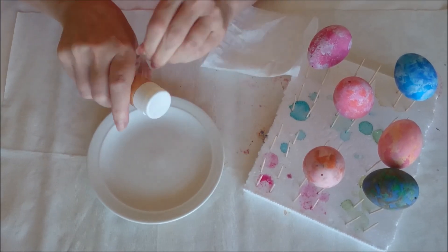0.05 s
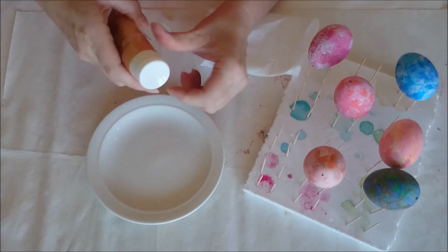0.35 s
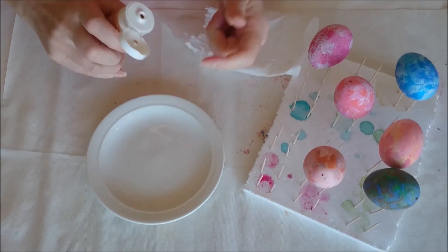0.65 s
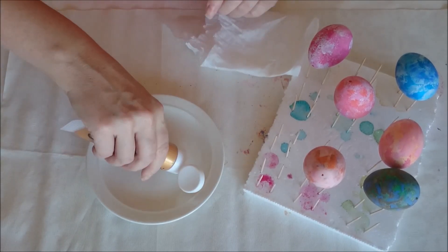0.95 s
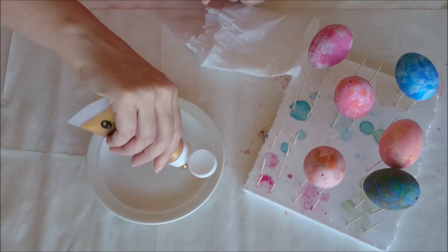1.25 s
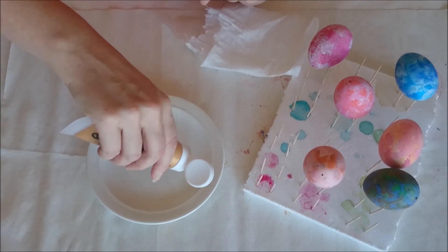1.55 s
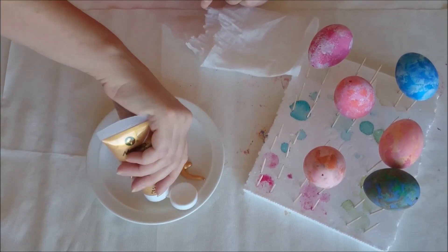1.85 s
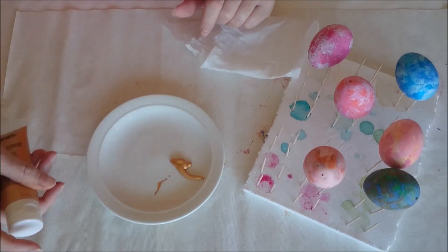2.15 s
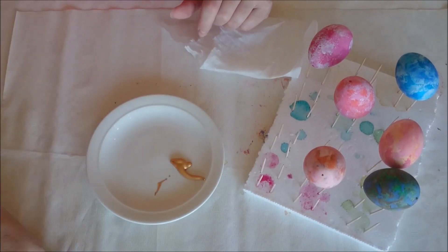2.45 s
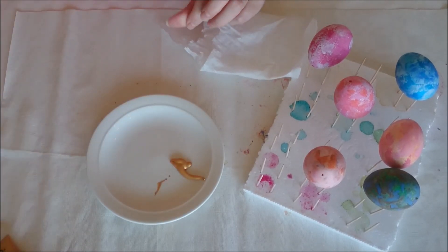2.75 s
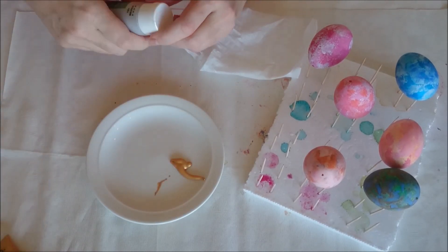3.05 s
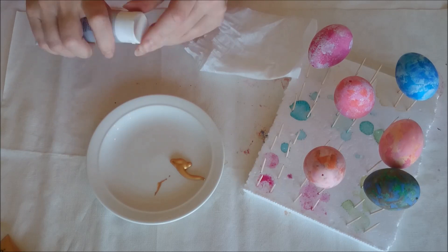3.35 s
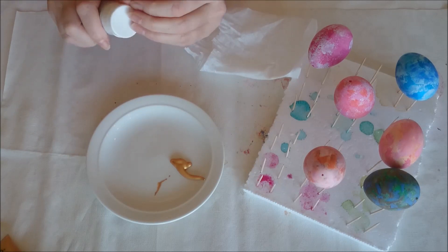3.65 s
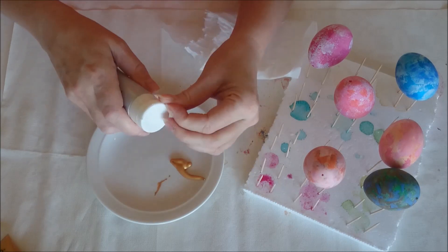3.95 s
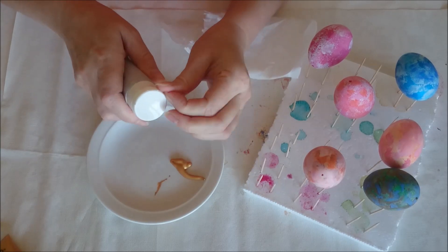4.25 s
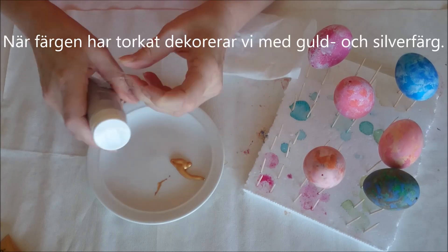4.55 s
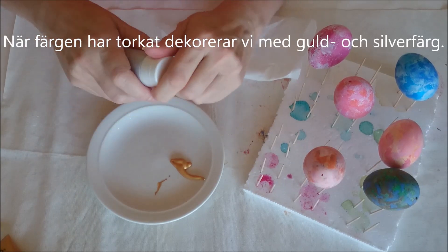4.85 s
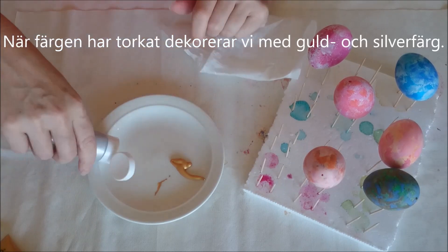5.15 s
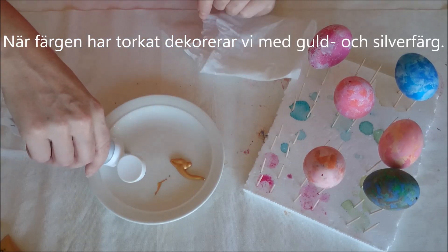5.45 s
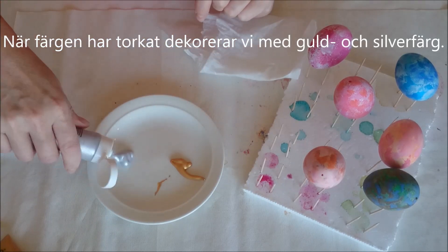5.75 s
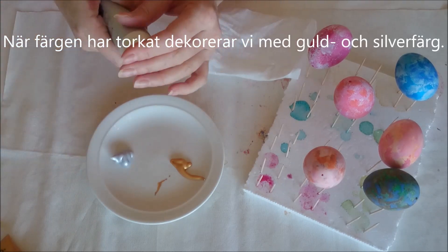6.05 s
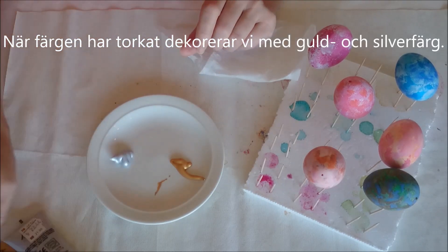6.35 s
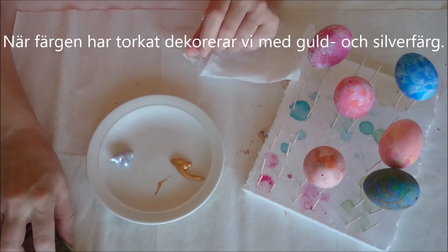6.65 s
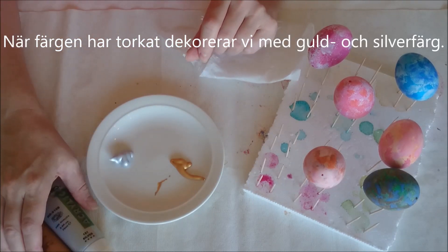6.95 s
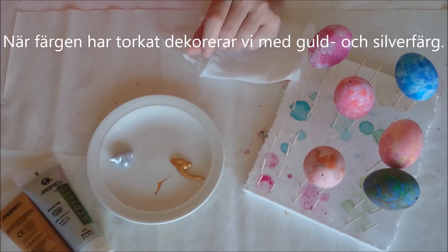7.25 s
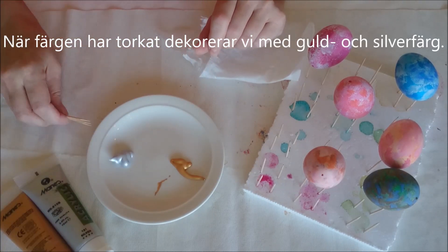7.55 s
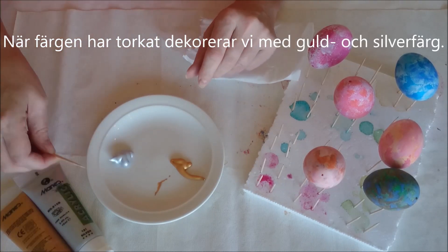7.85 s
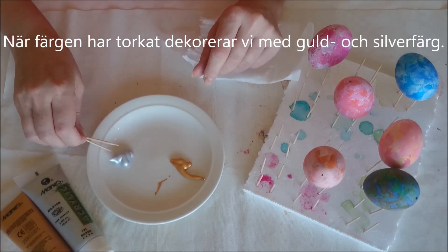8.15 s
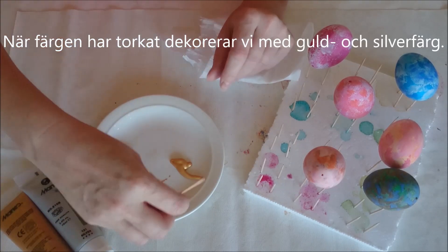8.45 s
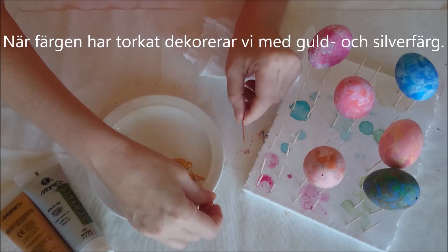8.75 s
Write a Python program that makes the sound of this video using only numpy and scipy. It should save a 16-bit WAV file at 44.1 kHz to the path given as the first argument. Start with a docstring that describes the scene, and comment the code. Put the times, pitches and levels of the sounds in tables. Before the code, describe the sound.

Sharp little snaps of plastic caps sound close and slightly left as two paint tubes are opened, tapped on a plate, squeezed with a tiny fizz and closed. Low rubbing and booming hand bumps travel through a cloth-covered table into the right microphone. Later the tubes drag with a low judder and a few knocks, followed by soft bumps. An appliance hums faintly in the small, dry room.

```python
"""An appliance hums faintly in a small dry room while arms and fingers rub on a cloth-covered table.
Two plastic paint tubes are flipped open with a creak and bright snaps, and every bump of the hands
booms through the table into the right microphone. The nozzles knock on a plate, paint is squeezed
out with a short fizz, and the caps snap shut. The tubes judder over the cloth and knock as they are
laid down; last, a toothpick is picked up."""
import sys
import numpy as np
from scipy import signal
from scipy.fft import rfft, irfft, next_fast_len
from scipy.io import wavfile
from scipy.ndimage import uniform_filter1d

SR = 44100
rng = np.random.default_rng(int(sys.argv[2]) if len(sys.argv) > 2 else 0)


def file_out(sig):
    """Save sig as 16-bit WAV at sys.argv[1]."""
    # one column per channel
    cols = np.atleast_2d(sig).T
    # limit, then scale
    lim = np.clip(cols, -1, 1)
    pcm = np.round(lim * 32767).astype(np.int16)
    wavfile.write(sys.argv[1], SR, pcm)


N = 387638
TIME = np.arange(N) / SR
ROOM_T60_S = 0.11


def from_db(db):
    return 10 ** (np.asarray(db) / 20)


def unit_rms(x):
    return x / np.sqrt(np.mean(x ** 2) + 1e-20)


def add(track, start_s, sound):
    i = int(start_s * SR)
    track[..., i:i + sound.shape[-1]] += sound[..., :N - i]


def band(x, low_hz, high_hz):
    return signal.sosfilt(signal.butter(2, [low_hz, high_hz], "band", fs=SR, output="sos"), x)


def coloured(x, spectrum):
    """Filter by a curve of (Hz, dB) points; rms 1."""
    hz, level_db = np.transpose(spectrum)
    size = next_fast_len(N, True)
    log_hz = np.log(np.arange(size // 2 + 1) * SR / size + 1)
    gain = from_db(np.interp(log_hz, np.log(hz), level_db, left=-90, right=-90))
    return unit_rms(irfft(rfft(x, size) * gain, size)[..., :N])


def noise(spectrum):
    return coloured(rng.standard_normal(N), spectrum)


def stereo_noise(shared):
    """White noise with a share of its power common to both sides."""
    return np.sqrt(shared) * rng.standard_normal(N) + np.sqrt(1 - shared) * rng.standard_normal((2, N))


def slip_train(per_s, spread_db):
    """Tiny slips of uneven size at random moments."""
    sizes = from_db(spread_db * np.minimum(rng.exponential(1, N), 4)) * rng.choice([-1, 1], N)
    return sizes * (rng.random(N) < per_s / SR)


def swells(rows, fullness):
    """One arch per slide; a gain track for each of the two level columns."""
    gains = np.zeros((2, N))
    for start_s, length_s, *levels_db in rows:
        arch = np.hanning(int(length_s * SR)) ** (1 / fullness)
        add(gains, start_s, from_db(levels_db)[:, None] * arch)
    return gains


def ring(force, modes):
    """Each mode answers a click with a dying sine; neighbours swing in opposite senses."""
    out = 0
    for k, (hz, level_db, t60_s) in enumerate(modes):
        radius, angle = from_db(-60 / (t60_s * SR)), 2 * np.pi * hz / SR
        feedback = [1, -2 * radius * np.cos(angle), radius ** 2]
        swing = signal.lfilter([0, np.sin(angle)], feedback, force + 1e-18)
        out = out + (-1) ** k * from_db(level_db) * swing
    return out


def panned(left_db):
    return unit_rms(from_db([[left_db / 2], [-left_db / 2]]))


def placed(x, left_db, lag_s):
    """Off-centre source: louder on one side, delayed on the right."""
    delayed = x[np.maximum(np.arange(len(x)) - round(lag_s * SR), 0)]
    return np.array([x, delayed]) * panned(left_db)


def room(x, left_db, wet_db, lag_s=0.00005):
    """Direct sound, then dense reflections that differ at each microphone."""
    t = TIME[:SR // 4]
    tail = rng.standard_normal((2, len(t))) * from_db(-60 * t / ROOM_T60_S) * (t > 0.0012)
    tail /= np.sqrt(np.sum(tail ** 2, axis=1, keepdims=True))
    reflections = signal.oaconvolve(np.array([x, x]), tail, axes=1)[:, :N]
    return placed(x, left_db, lag_s) + from_db(wet_db) * panned(left_db / 3) * reflections


# Room air spectrum and appliance tones. Each row: frequency in Hz, level in dB.
AIR_SPECTRUM = [(260, -27), (440, -4.5), (622, -11), (815, -5), (1200, -20.5), (1490, -15.5), (2230, -21),
                (3300, -22), (5930, -27.5), (14200, -26.5), (16000, -29.5)]
HUM_TONES = [(119, -73.5), (399.5, -60.5), (511, -72.5)]


def air_and_hum(air_db=-66, bass_db=-67.5, waver=0.14):
    """Quiet room air and an appliance's slightly unsteady hum."""
    air = from_db(air_db) * coloured(stereo_noise(shared=0.149), AIR_SPECTRUM) * panned(-1.4)
    bass_hz_db = [(15, 2), (50, -15.5), (120, -8), (220, -15),
                  (330, -21.5), (400, -10), (470, -14), (600, -52)]
    bass = from_db(bass_db) * coloured(stereo_noise(shared=0.16), bass_hz_db)
    unsteady = 1 + waver * noise([(1, 7), (4, 5), (30, -16.5)])
    hum = sum(from_db(level_db) * np.sin(2 * np.pi * hz * TIME) for hz, level_db in HUM_TONES)
    return air + bass + hum * unsteady * panned(-5)


# Effort of the resting arms. Each row: time in seconds, level in dB.
ARM_EFFORT = [(0, -34.5), (0.75, -42.5), (1.08, -35.5), (1.3, -44), (1.68, -51), (2.0, -42), (2.25, -49),
              (2.65, -35), (2.95, -48), (3.5, -39), (4.1, -39.5), (4.7, -30.5), (5.3, -37), (5.75, -42.5),
              (6.2, -44.5), (6.7, -43), (7.45, -42.5), (8.75, -46)]
# Arm slides. Each row: start and length in seconds, low and high rumble levels in dB.
ARM_SLIDES = [(0.0, 0.071, -33, -28.5), (0.38, 0.33, -24, -34.5), (1.89, 0.19, -36.5, -37),
              (2.31, 0.11, -42, -37.5), (2.46, 0.088, -37, -31), (2.63, 0.17, -34, -42),
              (2.77, 0.11, -58, -33), (3.72, 0.12, -35, -41.5), (3.96, 0.1, -34, -35),
              (4.2, 0.073, -35, -33), (4.35, 0.12, -38, -29), (4.76, 0.24, -35, -28.5),
              (5.24, 0.27, -29.5, -40), (5.87, 0.21, -29, -35.5), (6.5, 0.2, -36, -34),
              (6.76, 0.15, -34.5, -31), (7.31, 0.077, -32, -43), (7.66, 0.14, -30.5, -33),
              (8.51, 0.15, -28.5, -35), (8.68, 0.083, -36.5, -42)]


def arm_friction(resting_high_db=-2.5):
    """Gain tracks of the low and high rumble: steady effort plus slides."""
    times_s, effort_db = np.transpose(ARM_EFFORT)
    resting = from_db(np.interp(TIME, times_s, effort_db)) * from_db([[0], [resting_high_db]])
    return np.hypot(resting, swells(ARM_SLIDES, fullness=3.2))


# Friction spectra through the table. Each row: frequency in Hz, relative density in dB.
LOW_RUMBLE_SPECTRUM = [(15, -44.5), (27, -5.5), (38, -12), (52, -19), (67, 2.5), (78, -10), (95, -7.5),
                       (112, -43)]
HIGH_RUMBLE_SPECTRUM = [(85, -43.5), (102, -5.5), (120, 6), (143, 5), (165, -27.5), (195, -26.5),
                        (222, -16), (243, -26.5), (262, -18.5), (300, -30), (450, -44)]


def arm_rumble(gain_db=-2, window_s=0.093):
    """Arm friction through the table's resonances, evened out so that pressure sets the level."""
    out = 0
    for pressure, spectrum in zip(arm_friction(), [LOW_RUMBLE_SPECTRUM, HIGH_RUMBLE_SPECTRUM]):
        rumble = noise(spectrum)
        power = uniform_filter1d(rumble ** 2, int(window_s * SR))
        out = out + pressure * rumble / np.sqrt(power + 0.035)
    return from_db(gain_db) * out


# Rubbed cloth. Each row: frequency in Hz, relative density in dB.
CLOTH_SPECTRUM = [(170, -18), (300, 4.5), (520, 2.5), (700, 1), (900, -7), (1250, -1), (1700, -13.5),
                  (2600, -14.5), (5000, -28.5)]


def cloth_rub(arm_db=-44):
    """The cloth's dull grain follows the arms' friction and the dragged tubes."""
    arms = from_db(arm_db) * arm_friction()[1] ** 0.6
    _, tubes = swells(TUBE_DRAGS, fullness=1.7)
    grain = coloured(slip_train(per_s=1500, spread_db=2), CLOTH_SPECTRUM)
    return room(np.hypot(arms, tubes) * grain, left_db=-1.5, wet_db=0)


# Fingers and tubes sliding on plastic. Each row: start and length in seconds, level in dB.
PLASTIC_STROKES = [(0, 0.014, -43), (0.102, 0.03, -46.5), (0.335, 0.038, -54.5), (1.336, 0.19, -69),
                   (2.317, 0.089, -53.5), (2.414, 0.066, -53.5), (2.515, 0.045, -56), (2.773, 0.15, -72),
                   (3.408, 0.042, -61.5), (3.681, 0.036, -62), (4.135, 0.1, -64.5), (4.364, 0.02, -58),
                   (4.435, 0.037, -58), (4.498, 0.14, -62.5), (4.662, 0.055, -66), (4.787, 0.058, -60),
                   (4.982, 0.45, -67.5), (5.927, 0.023, -57.5), (6.38, 0.014, -46), (6.494, 0.041, -53.5),
                   (6.546, 0.015, -42), (6.586, 0.045, -53), (6.665, 0.12, -62), (6.806, 0.093, -57.5),
                   (7.03, 0.043, -55.5), (7.151, 0.03, -59.5), (7.263, 0.013, -46), (7.424, 0.091, -66.5)]
# Rubbed plastic. Each row: frequency in Hz, relative density in dB.
PLASTIC_SPECTRUM = [(1200, -4), (2500, -5), (4500, -9), (8000, -6), (11000, 2), (15500, -1.5), (17000, -58)]


def plastic_rustle(grip_s=0.00644, fade_db=-7, gain_db=2):
    """Each stroke grips quickly and fades as it slides, in a crackle of tiny slips."""
    pressure = np.zeros(N)
    for start_s, length_s, level_db in PLASTIC_STROKES:
        t = TIME[:int(length_s * SR)]
        grip = 1 - np.exp(-t / grip_s)
        add(pressure, start_s, grip * from_db(level_db + gain_db + fade_db * t / t[-1]))
    crackle = coloured(slip_train(per_s=700, spread_db=4.2), PLASTIC_SPECTRUM)
    return room(pressure * crackle, left_db=8, wet_db=-1)


# Cap snaps and small plastic ticks. Each row: start in seconds, relative levels of tube body,
# cap wall and lid in dB, lid pitch in Hz.
CAP_SNAPS = [(0.0888, -83, -79, -49, 13400), (0.3705, -65, -60, -48.5, 12400),
             (0.449, -59, -75, -52.5, 11600), (0.5652, -58.5, -53, -26, 12100),
             (0.9591, -62, -51.5, -41.5, 13400), (1.866, -64.5, -65, -49, 11800),
             (1.954, -72, -75, -59, 14400), (2.005, -71.5, -63.5, -56, 12600),
             (2.2187, -52, -51, -30.5, 15100), (2.3235, -48.5, -45.5, -33.5, 12700),
             (3.306, -73, -62, -65, 12600), (3.6003, -68.5, -71, -55.5, 12900),
             (3.804, -67.5, -67, -54.5, 12700), (3.8382, -72, -72, -57.5, 13700),
             (4.387, -84, -57, -49.5, 13100), (4.426, -71, -65, -56, 13400), (4.5372, -56, -70, -46, 12400),
             (4.7066, -65, -72, -52, 12800), (4.8016, -68, -66, -53, 14100),
             (4.9275, -50.5, -44.5, -22, 12600), (5.199, -58, -50, -45, 13000),
             (6.0332, -48, -41.5, -22, 14800), (6.1068, -47, -35.5, -25, 12300),
             (6.564, -67, -67, -45.5, 12100), (6.6195, -58, -55, -44, 11400),
             (6.69, -61.5, -80, -69, 12000), (6.816, -58.5, -50.5, -61, 12200),
             (7.1654, -65, -70, -60, 12500), (7.277, -61, -82, -59, 11500), (7.9706, -80, -70, -63, 11040)]


def cap_snaps(crack_s=0.00051, catch_s=0.0029, catch_db=-9, gain_db=-11):
    """The lid jumps its lip and catches again; the crack excites tube body, cap wall and lid."""
    t, out = TIME[:SR // 8], np.zeros((2, N))
    jump = np.exp(-(t / crack_s - 1) ** 2)
    catch = from_db(catch_db) * np.exp(-abs(t - catch_s) / crack_s)
    echoes = from_db(-60 * t / ROOM_T60_S) * (t > 0.001)
    envelopes = np.array([jump + catch, echoes, echoes])   # direct, left room, right room
    grips = rng.random((len(CAP_SNAPS), 2))
    grains = rng.standard_normal((len(CAP_SNAPS), 3, 3, len(t)))   # moving hands: new reflections
    for (start_s, *levels_db, lid_hz), grain, (cavity, angle) in zip(CAP_SNAPS, grains, grips):
        cap_echo = np.roll(grain, int((1 + cavity) * 0.0006 * SR), axis=-1)   # ripples the spectrum
        bursts = (grain - 0.5 * cap_echo) * envelopes
        bursts += band(bursts, lid_hz - 850, lid_hz + 850)   # lid resonance
        bands_hz = [(2200, 5400), (5600, 10500), (lid_hz - 2700, lid_hz + 2700)]
        for level_db, edges_hz, burst, wet_db in zip(levels_db, bands_hz, bursts, [1, -1, -5]):
            direct = placed(unit_rms(band(burst[0], *edges_hz)), left_db=10, lag_s=angle * 0.00004)
            reflected = unit_rms(band(burst[1:], *edges_hz)) * panned(2.4)
            add(out, start_s, from_db(level_db + gain_db) * (direct + from_db(wet_db) * reflected))
    return out


# Cap modes. Each row: frequency in Hz, gain in dB, T60 in seconds.
HOLLOW_CAP_MODES = [(1700, 2.5, 0.04), (2150, -7, 0.04), (3000, -7, 0.23), (3440, -4, .1), (5250, -3, .11)]


def cap_ring(gain_db=-5):
    """The hollow cap rings on briefly after each snap."""
    force = np.zeros(N)
    for start_s, body_db, *_ in CAP_SNAPS:
        add(force, start_s, from_db([body_db + gain_db]))
    return placed(ring(force, HOLLOW_CAP_MODES), left_db=-7, lag_s=0.00007)


# Creaking lid. Each row: frequency in Hz, relative density in dB.
CREAK_SPECTRUM = [(1500, -31), (3000, -25), (4400, -31), (5600, -13.5), (8000, -7), (10200, 10), (14500, 2),
                  (16500, -16)]


def lid_creak(start_s=0.102, length_s=0.0089, level_db=-28, jitter_s=0.0006, slip_s=0.00023):
    """A stiff lid drags over its lip in a quick run of eight slips."""
    t, force = TIME[:SR // 200], np.zeros(N)
    for k in range(8):
        offset_s = k / 8 * length_s + rng.random() * jitter_s
        strength = np.sin(np.pi * (k + 1.5) / 10)
        add(force, start_s + offset_s, strength * rng.standard_normal(len(t)) * np.exp(-t / slip_s))
    burst = coloured(force, CREAK_SPECTRUM) * np.sqrt(length_s * SR / N)   # rms 1 while it lasts
    return room(from_db(level_db) * burst, left_db=9, wet_db=1)


# Hand bumps. Each row: start in seconds, relative levels of the low, middle and high modes in dB.
HAND_BUMPS = [(0.119, -36.5, -22, -36.5), (0.355, -58, -21.5, -38.5), (0.567, -45, -42, -38),
              (0.848, -15.5, -7, -26), (0.962, -21, -37, -23.5), (1.134, -56, -25.5, -49),
              (1.845, -29.5, -67, -30), (2.527, -31.5, -69, -24), (3.222, -36.5, -30, -40.5),
              (4.138, -45, -18.5, -33), (4.613, -50, -61, -29.5), (4.703, -31.5, -35, -64),
              (4.934, -28, -19, -32.5), (5.178, -25, -21.5, -32.5), (5.591, -40, -29.5, -38),
              (7.161, -31, -60, -25), (7.27, -30.5, -40, -25.5), (7.529, -37.5, -27.5, -47.5),
              (7.633, -35.5, -23, -38), (7.978, -36, -32, -46), (8.774, -14, -51, -42)]
# Table mode families. Each row: frequency in Hz, gain in dB, T60 in seconds.
LOW_MODES = [(66.94, -2, 0.4), (86.7, -13.5, 0.48)]
MIDDLE_MODES = [(121.2, -4, 0.29), (106.5, -6.5, 0.12), (260, -28.5, 0.26)]
HIGH_MODES = [(139.95, -1.5, 0.32), (226.8, -10.5, 0.21), (260, -12, 0.11), (347, -32.5, .1)]


def table_booms(push_s=0.0032, gain_db=9.5):
    """A soft push sets the table swinging; where it lands decides which modes answer."""
    t, out = TIME[:SR // 20], 0
    for family, modes in enumerate([LOW_MODES, MIDDLE_MODES, HIGH_MODES]):
        force, main_hz = np.zeros(N), modes[0][0]
        push = band(t * np.exp(-2 * t / push_s), 0.64 * main_hz, 3 * main_hz)   # legs take the slow part
        push /= abs(np.sum(push * np.exp(-2j * np.pi * main_hz * t)))   # unit drive at the main mode
        for start_s, *levels_db in HAND_BUMPS:
            add(force, start_s, from_db(levels_db[family] + gain_db) * push)
        out = out - ring(force, modes)
    return out


# Padded top under a bump. Each row: frequency in Hz, relative density in dB.
THUD_SPECTRUM = [(160, -17), (222, 8), (245, 2), (265, 8), (320, -10.5), (450, -5), (700, -12), (1500, -22)]


def cloth_thuds(gain_db=-17, rise_s=0.0022, fade_s=0.043):
    """Each bump also gives a short, dull thud of the cloth-covered top."""
    t, contact = TIME[:SR // 4], np.zeros(N)
    envelope = np.exp(-t / fade_s) * (1 - np.exp(-t / rise_s))
    for start_s, *_, high_db in HAND_BUMPS:
        add(contact, start_s, from_db(high_db + gain_db) * envelope)
    return room(contact * noise(THUD_SPECTRUM), left_db=-7.5, wet_db=-2.5)


# Nozzle on plate; tube or hand on tabletop.
# Each row: start in seconds, relative level in dB, tilt in dB per octave.
KNOCKS_ON_PLATE = [(0.962, -25.5, -2), (1.844, -33, -3.5), (2.795, -49, -2), (5.202, -35.5, 0.5)]
KNOCKS_ON_TOP = [(2.532, -41.5, -17), (4.138, -55.5, 23), (4.613, -43, 9.5), (6.385, -38.5, -8),
                 (6.507, -48.5, 5), (6.56, -38, -9), (6.574, -35, -4.5), (7.155, -28, 5), (7.165, -40, 14),
                 (7.265, -37, 19.5), (7.277, -40, -2)]
# Plate and tabletop modes. Each row: frequency in Hz, gain in dB, T60 in seconds.
MODES_OF_PLATE = [(405.5, -5.5, 0.076), (511, 3, 0.21), (618, -4, 0.1), (718, -7.5, .08), (827, -9, 0.14),
                  (1080, -6, 0.056), (1242, 10, 0.052), (1640, -13, 0.079)]
MODES_OF_TOP = [(405.7, -1, 0.13), (503.6, -3, 0.16), (647, -5.5, 0.089), (766, -1, .07), (902, 2.5, 0.13),
                (1016, 0, 0.063), (1241, 8, 0.043), (1376, -6.5, 0.055), (1616, -7, 0.078),
                (1884, -10.5, 0.047), (2370, -25, 0.039)]


def knocks(rows, modes, scuff_s=0.01, scuff_db=-22, gain_db=-12, clack_db=18, pivot_hz=900):
    """A tap and a short scuff ring the surface; each knock's own tilt makes it duller or brighter."""
    t, ringing, contact = TIME[:SR // 20], 0, np.zeros(N)
    scuffs = from_db(scuff_db) * rng.standard_normal((len(rows), len(t))) * np.exp(-t / scuff_s)
    strikes = (t == 0) + scuffs * (t > 0.002) / 2
    for mode in modes:
        force, octaves = np.zeros(N), np.log2(mode[0] / pivot_hz)
        for (start_s, level_db, tilt_db), strike in zip(rows, strikes):
            add(force, start_s, from_db(level_db + gain_db + tilt_db * octaves) * strike)
        ringing = ring(force, [mode]) - ringing   # neighbours alternate in sign
    for (start_s, level_db, _), scuff in zip(rows, scuffs):
        add(contact, start_s, from_db(level_db + gain_db + clack_db) * scuff)
    clack = band(contact, 300, 3100)   # the soft tube itself hardly rings
    return room(ringing + clack, left_db=-3, wet_db=-11, lag_s=0.00012)


# Wet paint. Each row: start and decay time in seconds, level in dB, pitch in Hz.
PAINT_SQUELCHES = [(1.345, 0.017, -61.5, 2500), (5.732, 0.0084, -66.5, 6860), (5.774, 0.0059, -45.5, 8500),
                   (8.702, 0.014, -63, 3000)]


def paint_squelches(band_ratio=1.176):
    """Paint and air leave the nozzle, or paint is stirred: short, narrow bursts of fizz."""
    t, out = TIME[:SR // 8], np.zeros(N)
    for start_s, decay_s, level_db, hz in PAINT_SQUELCHES:
        fizz = unit_rms(band(rng.standard_normal(len(t)), hz / band_ratio, hz * band_ratio))
        add(out, start_s, from_db(level_db) * np.exp(-t / decay_s) * fizz)
    return room(out, left_db=5, wet_db=2)


# Touches on a rim. Each row: start in seconds, level in dB.
RIM_TOUCHES = [(5.1993, -45), (7.055, -38)]
# Rim modes. Each row: frequency in Hz, gain in dB, T60 in seconds.
RIM_MODES = [(4430, -17.5, 0.16), (9130, 0.5, 0.12), (13640, -17, .08), (14620, 0, 0.071)]


def rim_tings():
    """Light touches leave thin high tones in a small hard rim."""
    force = np.zeros(N)
    for start_s, level_db in RIM_TOUCHES:
        add(force, start_s, from_db([level_db]))
    return room(ring(force, RIM_MODES), left_db=-4, wet_db=-31)


# Tube dragged over cloth. Each row: start and length in seconds, judder and scrape levels in dB.
TUBE_DRAGS = [(6.315, 0.073, -30, -68), (6.385, 0.052, -19, -62), (6.425, 0.071, -28.5, -69),
              (6.5, 0.068, -19.5, -51), (6.545, 0.052, -31.5, -51.5), (6.58, 0.099, -20.5, -59),
              (6.74, 0.14, -24.5, -68), (6.955, 0.052, -33.5, -66), (7.04, 0.076, -35, -61.5)]


def tube_judder(mode_hz=140.2, wander=0.043, slips_db=-17):
    """Stick and slip lock to a table mode; the slips add a rough upper ring."""
    strength, _ = swells(TUBE_DRAGS, fullness=3.06)
    hz = mode_hz * (1 + wander * noise([(2, 3.5), (20, 1.5), (80, -14)]))
    swing = np.sqrt(2) * np.sin(2 * np.pi * np.cumsum(hz) / SR)
    slips = noise([(170, -15), (220, 12.5), (250, -1.5), (290, -12), (420, -10), (700, -29)])
    return strength * (swing + from_db(slips_db) * slips)


def scene():
    """Caps, hands and paint over the quiet room; table vibration is almost all on the right."""
    caps = cap_snaps() + cap_ring() + lid_creak() + rim_tings()
    contacts = knocks(KNOCKS_ON_PLATE, MODES_OF_PLATE) + knocks(KNOCKS_ON_TOP, MODES_OF_TOP)
    vibration = (arm_rumble() + table_booms() + tube_judder()) * from_db([[-35], [0]])
    hands = vibration + cloth_thuds() + cloth_rub() + plastic_rustle()
    return caps + contacts + hands + paint_squelches() + air_and_hum()


def record(dry):
    """Steep low-pass at 16.5 kHz."""
    return signal.sosfilt(signal.ellip(10, 0.1, 80, 16500, fs=SR, output="sos"), dry)


dry = scene()
out = record(dry)
file_out(out)
```